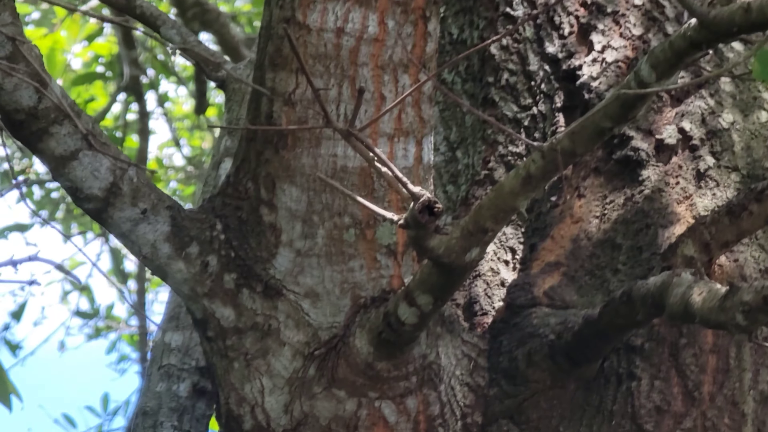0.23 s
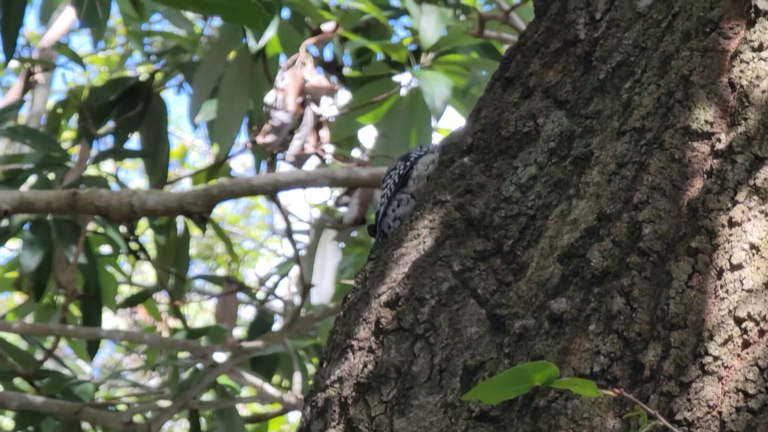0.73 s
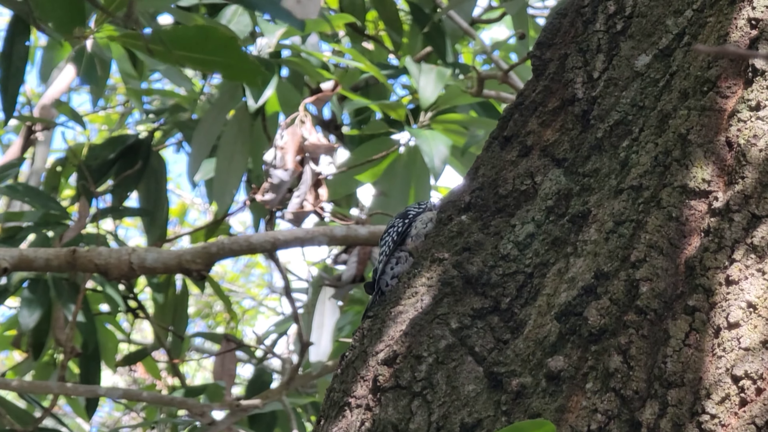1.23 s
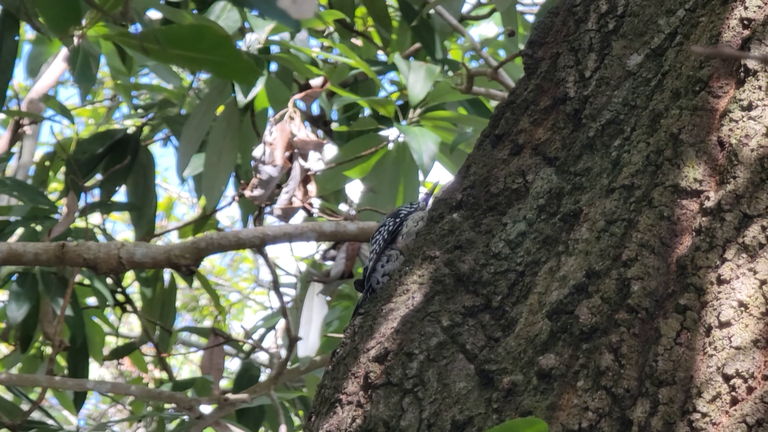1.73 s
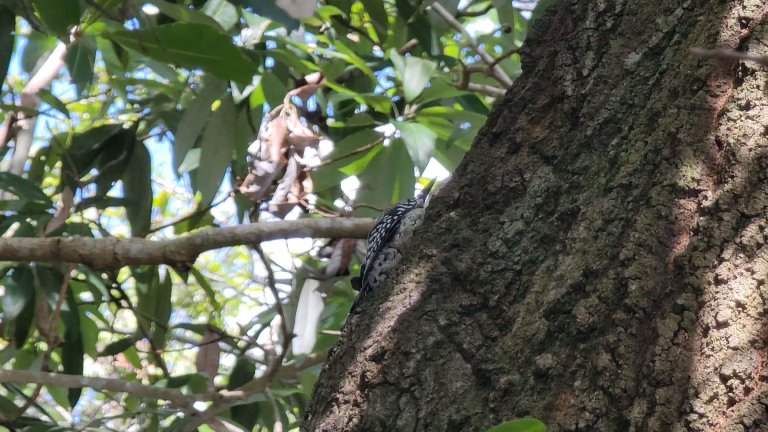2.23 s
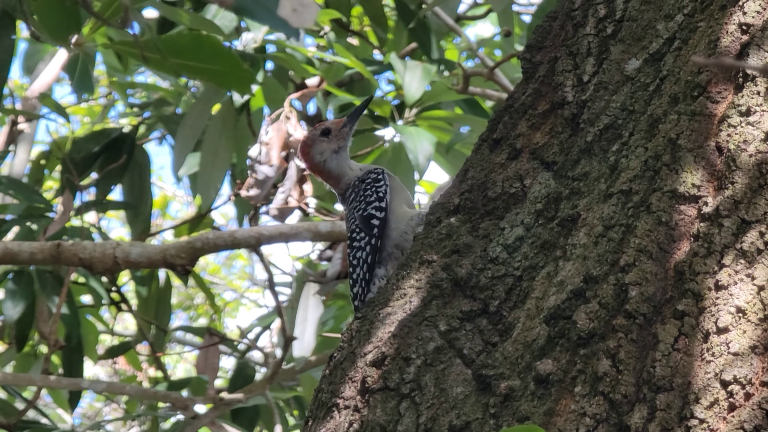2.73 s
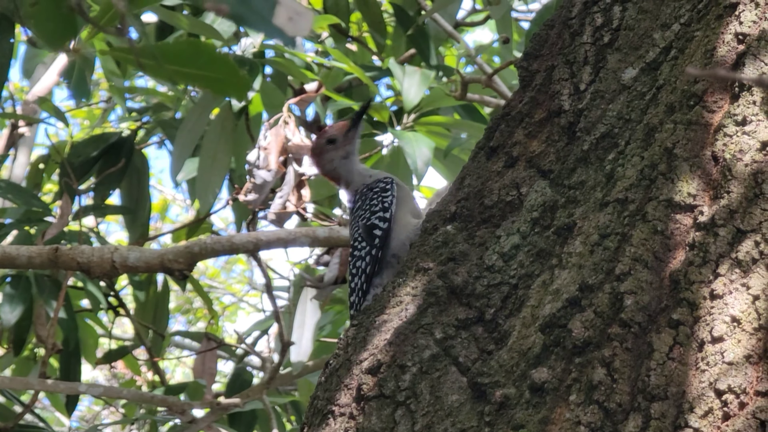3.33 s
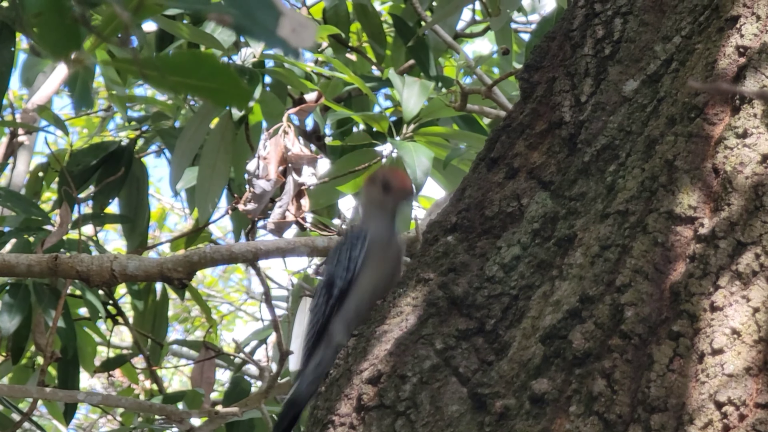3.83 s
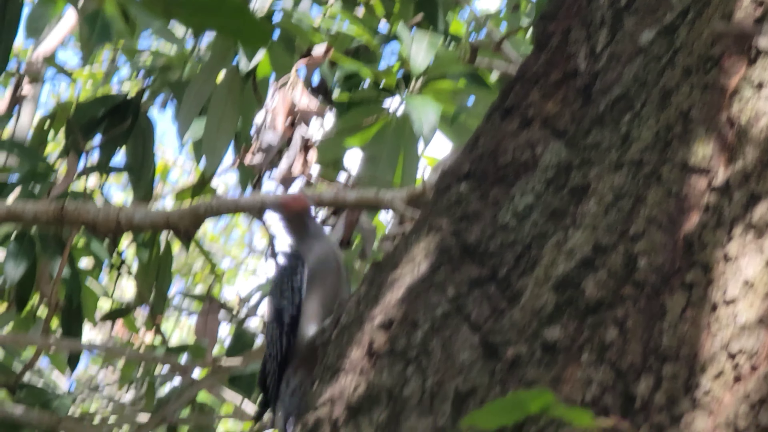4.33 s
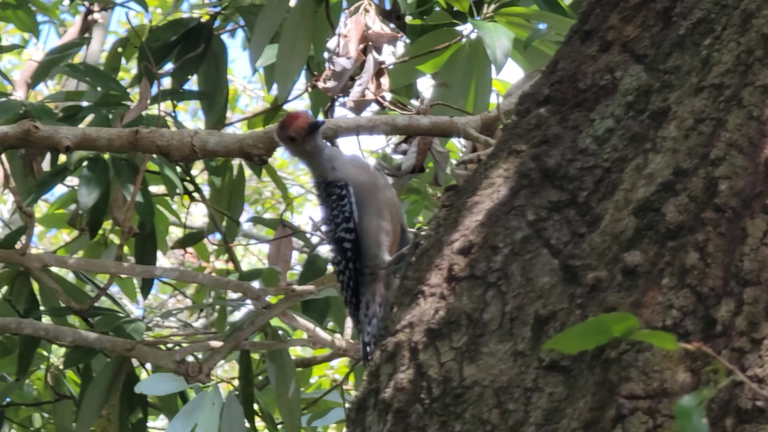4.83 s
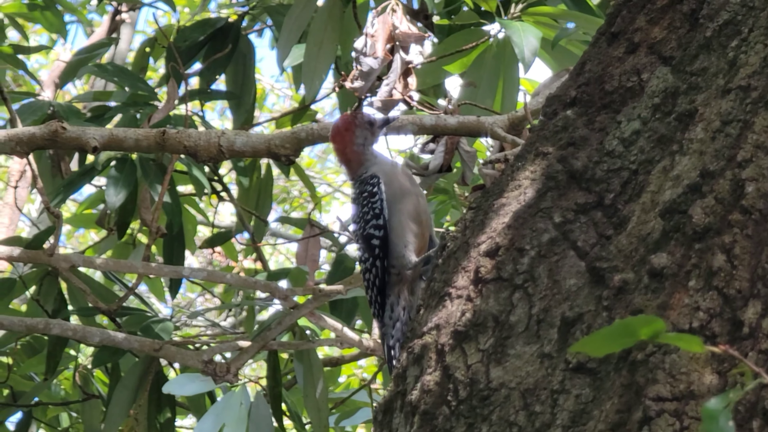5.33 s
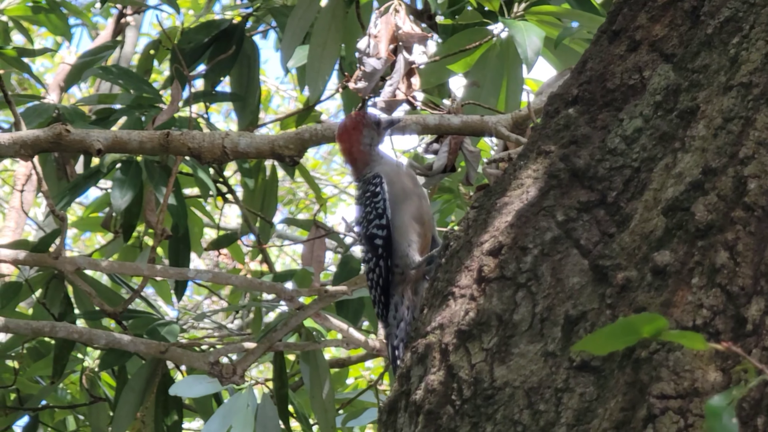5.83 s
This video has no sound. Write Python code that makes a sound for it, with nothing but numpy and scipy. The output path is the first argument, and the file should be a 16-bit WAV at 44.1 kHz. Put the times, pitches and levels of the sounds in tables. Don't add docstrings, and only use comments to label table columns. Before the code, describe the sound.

Among garden trees, a steady low engine rumble swells and dips under a blurred hum, a faint motor drone and a thin insect whine. A soft low bird note comes early. Then a woodpecker gives five quick whistled calls, each jumping up and sliding down, with slight roughness at the end and a short outdoor echo. The calls are the clearest sound, slightly to the right in stereo; leaves rustle faintly.

```python
import sys
import numpy as np
from scipy import signal
from scipy.fft import rfft, irfft
from scipy.io import wavfile
from scipy.ndimage import uniform_filter1d

SR = 44100
rng = np.random.default_rng(int(sys.argv[2]) if len(sys.argv) > 2 else 0)


def store_pcm(level_fs):
    pcm = np.round(np.clip(level_fs, -1, 1) * 32767).astype(np.int16)
    wavfile.write(sys.argv[1], SR, np.atleast_2d(pcm).T)


def volts_from_decibels(level):
    exponent = np.asarray(level, float) / 20
    return 10 ** exponent


N = 268304
T = np.arange(N) / SR
HZ = np.arange(N // 2 + 1) * SR / N + 1e-3


def along_hz(table, hz, col=1):
    table = np.array(table, float)
    return np.interp(np.log(hz), np.log(table[:, 0]), table[:, col])


def along_time(table):
    return np.interp(T, *np.transpose(table))


def walk(rate):
    hold = int(SR / rate)
    steps = np.repeat(rng.standard_normal(N // hold + 1), hold)
    return 1.3 * uniform_filter1d(uniform_filter1d(steps, hold), hold)[:N]


def diffuse(colour, flicker_db, rate):
    # (frequency [Hz], likeness [0-1], lead of the left [rad], left minus right [dB])
    ports_apart = [(30, 0.96, 0.19, -4), (124, 0.96, 0.18, -1), (206, 0.76, .2, -3.5),
                   (284, 0.35, 0.87, -1), (453, 0.83, 2.1, 0), (740, 0.67, 2.32, -.5),
                   (1320, 0.67, 3.25, -1.5), (2060, 0.04, 3.6, -2.5), (4500, 0.09, 2.9, -4),
                   (8400, 0, 3.2, -1), (15000, 0.03, 4, 0)]
    like = np.clip(along_hz(ports_apart, HZ, col=1), 0, 1)
    lead = along_hz(ports_apart, HZ, col=2)
    pan_db = along_hz(ports_apart, HZ, col=3)
    shared, left, right = rfft(rng.standard_normal((3, N)))
    turn = np.exp(.5j * lead)
    pair = np.sqrt(like) * shared * np.array([turn, 1 / turn])
    pair = pair + np.sqrt(1 - like) * np.array([left, right])
    summed = np.sqrt((1 + like * np.cos(lead)) / 2)
    inside = (HZ > colour[0][0]) & (HZ < colour[-1][0])
    pair = pair * inside * volts_from_decibels(along_hz(colour, HZ) + np.array([pan_db, -pan_db]) / 2) / summed
    octave, out = np.log2(HZ / 16), 0
    for k in range(11):
        share = np.clip(1 - np.abs(octave - k), 0, 1)
        if (share * inside).any():
            out = out + irfft(pair * share, N) * volts_from_decibels(flicker_db * walk(rate))
    return out / np.sqrt(np.mean(out.mean(axis=0) ** 2))


def machine_rumble():
    # (frequency [Hz], density [dB per Hz])
    rumble_colour = [(20, -21), (31, -13), (44, -20), (52, 0.5), (58, -1), (66, -3.5), (76, -4), (92, -0.5),
                     (106, -7.5), (120, -4), (132, -28.5), (160, -52)]
    # (time [s], level [dB])
    rumble_level = [
        (0.0, -48.5),
        (1.3, -46),
        (1.85, -49.5),
        (2.2, -46),
        (3.6, -46.5),
        (3.95, -43.5),
        (4.4, -47),
        (6.08, -46.5),
    ]
    return diffuse(rumble_colour, flicker_db=1.5, rate=3.65) * volts_from_decibels(along_time(rumble_level))


def town_hum():
    # (frequency [Hz], density [dB per Hz])
    hum_colour = [(76, -29), (130, -5), (144, -6), (350, -9.5), (409, -10.5), (479, -12), (638, -13),
                  (770, -12.5), (2460, -28.5), (2720, -32), (4000, -37), (5200, -45), (8800, -120)]
    return diffuse(hum_colour, flicker_db=0.56, rate=2.46) * volts_from_decibels(-57)


def leaf_breeze():
    # (frequency [Hz], density [dB per Hz])
    leaf_colour = [(1760, 4), (3000, 0), (3260, 0.5), (3700, -0.5), (3940, -0.5), (6170, -2), (8850, -2),
                   (11000, -10.5), (12800, -8), (15200, -9), (16000, -17)]
    # (time [s], level [dB])
    breeze_level = [
        (0.0, -73),
        (1.08, -72.5),
        (1.1, -71.5),
        (1.9, -70),
        (2.75, -72),
        (3.4, -70),
        (4.15, -70),
        (4.4, -72),
        (5.25, -70.5),
        (6.08, -69),
    ]
    rustle_hz, usual_breeze_db = 6500, -71.5
    rustle_slope = 0.73
    breeze_db = along_time(breeze_level)
    leaves = diffuse(leaf_colour, flicker_db=.6, rate=9) * volts_from_decibels(breeze_db + 3)
    highpass = signal.butter(2, rustle_hz, "high", fs=SR, output="sos")
    top = signal.sosfiltfilt(highpass, leaves)
    return leaves + top * (volts_from_decibels(rustle_slope * (breeze_db - usual_breeze_db)) - 1)


def whines():
    # (pitch [Hz], wander [Hz], level [dB], swell [dB], left minus right [dB])
    thin_tones = [
        (355.7, 12, -70, 2.5, -6),
        (5080, 7.9, -85.5, 3, -6),
    ]
    out = np.zeros((2, N))
    for hz, wander_hz, db, swell_db, pan_db in thin_tones:
        tone = np.sin(2 * np.pi * np.cumsum(hz + wander_hz * walk(8)) / SR)
        out += tone * volts_from_decibels(db + swell_db * walk(2.49) + np.array([[pan_db], [-pan_db]]) / 2)
    return out


def faint_whistles():
    # (time [s], length [s], start pitch [Hz], end pitch [Hz], level [dB], left minus right [dB])
    faint_notes = [
        (0.57, 0.19, 478, 474, -58, 7),
        (2.488, 0.041, 2900, 2900, -64.5, -6),
        (5.133, 0.038, 2730, 2500, -61.5, -10),
    ]
    out = np.zeros((2, N))
    for start, length, hz0, hz1, db, pan_db in faint_notes:
        u = np.clip((T - start) / length, 0, 1)
        note = np.sin(np.pi * u) * np.sin(2 * np.pi * np.cumsum(hz0 + (hz1 - hz0) * u) / SR)
        out += note * volts_from_decibels(db + np.array([[pan_db], [-pan_db]]) / 2)
    return out


def woodpecker():
    # (time [s], second harmonic
    # [Hz], its level on the right [dB], left minus right [dB])
    call_1 = [(1.525, 2120, -68, -6), (1.546, 2410, -60, -8), (1.557, 2705, -57, -13),
              (1.574, 2776, -43.5, -14), (1.584, 2793, -47, -7), (1.602, 2773, -45, -7),
              (1.611, 2636, -42, -6), (1.621, 2630, -55, -9), (1.643, 2440, -54, -11),
              (1.656, 2330, -56, -10), (1.668, 2380, -50, -10), (1.68, 2300, -68, -9),
               (1.694, 2220, -67, -6), (1.71, 2187, -57, -9), (1.726, 2176, -67, -7),
               (1.738, 2190, -64, -8), (1.753, 2210, -58.5, -3), (1.778, 2140, -74, -6)]
    call_2 = [(2.308, 2530, -61, -4), (2.325, 2735, -59, -10), (2.348, 2758, -43.5, -6),
              (2.362, 2735, -45, -4), (2.373, 2730, -45, -4), (2.388, 2580, -48.5, -2),
              (2.402, 2560, -50, -10), (2.416, 2490, -67, -10), (2.428, 2390, -53, -6),
              (2.436, 2400, -65, -5), (2.446, 2360, -57, -8), (2.458, 2330, -72, -5)]
    call_3 = [(3.088, 2536, -70, -8), (3.099, 2580, -51, -6), (3.11, 2667, -46.5, -5),
              (3.135, 2664, -42.5, -7), (3.149, 2662, -41.5, -7), (3.159, 2605, -44, -5),
              (3.178, 2465, -56, -14), (3.192, 2430, -59, -8), (3.212, 2350, -72, -4)]
    call_4 = [(4.062, 2540, -66, -6), (4.073, 2663, -50, -6), (4.085, 2730, -45, -12),
              (4.101, 2635, -40.5, -6), (4.113, 2600, -40, -3), (4.123, 2594, -43.5, -5),
              (4.133, 2525, -51.5, -5), (4.152, 2350, -59, -10), (4.175, 2250, -62, -8)]
    call_5 = [(4.921, 2520, -67, -7), (4.932, 2600, -52, -8), (4.948, 2630, -42.5, -6),
              (4.972, 2592, -41, -2), (4.986, 2535, -42, -9), (4.997, 2446, -53, -11),
              (5.012, 2440, -42.5, -15), (5.019, 2330, -51, -7), (5.028, 2344, -44, -12),
              (5.043, 2305, -61, -9), (5.059, 2235, -58, -3), (5.067, 2080, -74, 0), (5.078, 1970, -66, 2),
               (5.092, 1980, -63, -3), (5.109, 1985, -66, -2), (5.145, 1875, -70, -2),
               (5.155, 1860, -76, 0)]
    song = [call_1, call_2, call_3, call_4, call_5]
    # (first [dB], third [dB], fourth [dB], throat lift [dB], sent to the trees [dB])
    voices = [
        (-12.5, -28, -17, 20, 3.5),
        (-7.5, -29, -20.5, 11, -2),
        (-15, -27.5, -36, 10, -3.5),
        (-19, -28.5, -36, 15, -2),
        (-20.5, -36, -32, 8, -0.5),
    ]
    slur_s, edge_s, rest_hz = .006, .006, 2190
    throat_hz, throat_width_hz = 3150, 610
    steady_db, tired_db, overtone_db, tired_waver = .6, 1.5, 1.5, .009
    sag_dull_db = -7
    sag_throw_db = -7
    first_shadow, left_lead_s = .3, .00045

    ports = np.zeros((3, N))
    for call, (first_db, third_db, fourth_db, lift_db, trees_db) in zip(song, voices):
        s, *columns = np.transpose(call)
        hz, second_db, pan_db = (uniform_filter1d(np.interp(T, s, c), int(slur_s * SR)) for c in columns)
        gate = np.clip(np.minimum(T - s[0], s[-1] - T) / edge_s, 0, 1)
        tired = np.clip((hz.max() - hz) / (hz.max() - rest_hz), 0, 1)
        waver = 1 + 0.0027 * walk(150) + tired_waver * tired * walk(70)
        phase = np.pi * np.cumsum(hz * waver) / SR
        throat = np.exp(-((3 / 2 * hz - throat_hz) / throat_width_hz) ** 2)
        dull_db = sag_dull_db * tired
        gains_db = [first_db + dull_db, 0, third_db + lift_db * throat, fourth_db + dull_db]
        shadows = [first_shadow, 1, 1 - throat, first_shadow]
        for k, (db, shadow) in enumerate(zip(gains_db, shadows)):
            tremble_db = (steady_db + tired_db * tired + overtone_db * (k > 1)) * walk(80)
            level = np.sqrt(2) * volts_from_decibels(second_db + db + tremble_db)
            partial = gate * level * np.sin((k + 1) * phase)
            to_trees = partial * volts_from_decibels(trees_db + sag_throw_db * tired)
            ports += [partial * volts_from_decibels(pan_db * shadow), partial, to_trees]
    ports[0] = irfft(rfft(ports[0]) * np.exp(2j * np.pi * HZ * left_lead_s), N)
    return ports


def scatter(x):
    # (delay [s], left [dB], right [dB])
    clear_echoes = [
        (.03, -23, -12),
        (.068, -16, -20),
        (0.084, -26, -23),
        (0.119, -27, -22),
    ]
    scatter_db, t60_s, gap_s = -16, 0.84, .022
    boughs, sway_s, patchy_db = 3, .00009, 2.5
    t, out = T[:SR], 0
    fade = np.exp(-np.log(1000) * t / t60_s) * np.clip(t / gap_s - 1, 0, 1)
    for bough in range(boughs):
        echoes = rng.standard_normal((2, SR)) * fade * volts_from_decibels(patchy_db * walk(41)[:SR])
        energy = np.sum(echoes ** 2, axis=1, keepdims=True)
        echoes *= volts_from_decibels(scatter_db + np.array([[-2.0], [2.0]])) / np.sqrt(boughs * energy)
        for delay, left_db, right_db in clear_echoes[bough::boughs]:
            echoes[:, int(delay * SR)] += volts_from_decibels(np.array([left_db, right_db]))
        wet = signal.fftconvolve(x[None], echoes, axes=1)[:, :N]
        out = out + np.array([np.interp(T + sway_s * walk(110), T, w) for w in wet])
    return out


def scene():
    background = machine_rumble() + town_hum() + leaf_breeze() + whines()
    left, right, to_trees = woodpecker()
    return background + faint_whistles() + np.array([left, right]) + scatter(to_trees)


def roll_off(x):
    return signal.sosfilt(signal.butter(12, 15390, fs=SR, output="sos"), x)


def record(dry):
    start = np.clip(T / .004, 0, 1)
    return roll_off(dry * start)


dry = scene()
out = record(dry)
store_pcm(out)
```